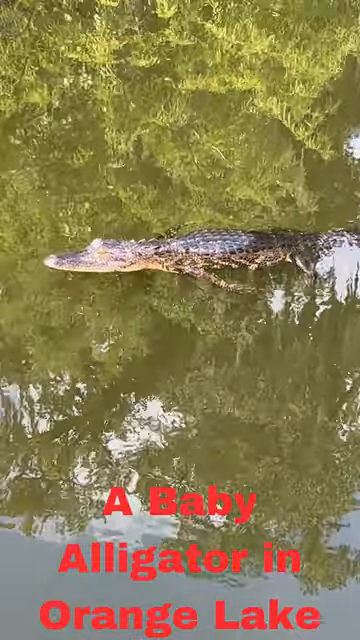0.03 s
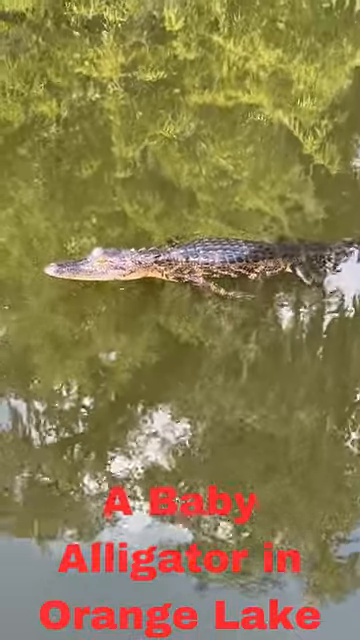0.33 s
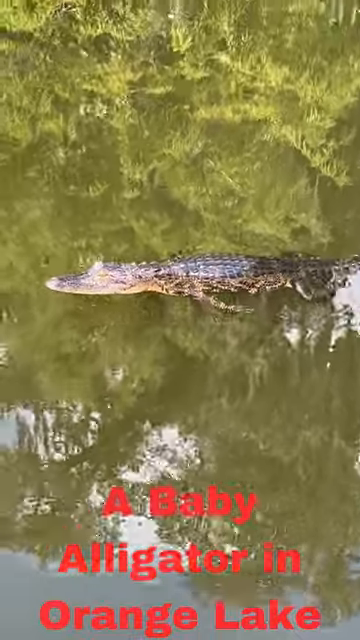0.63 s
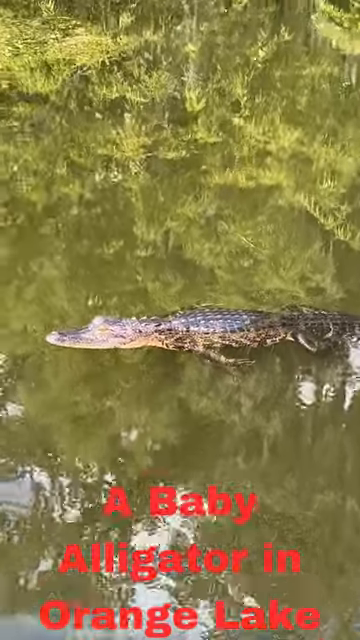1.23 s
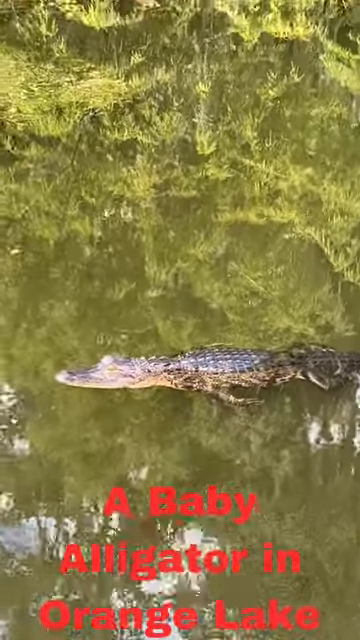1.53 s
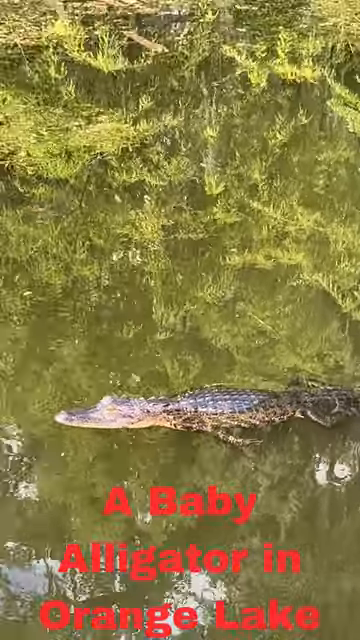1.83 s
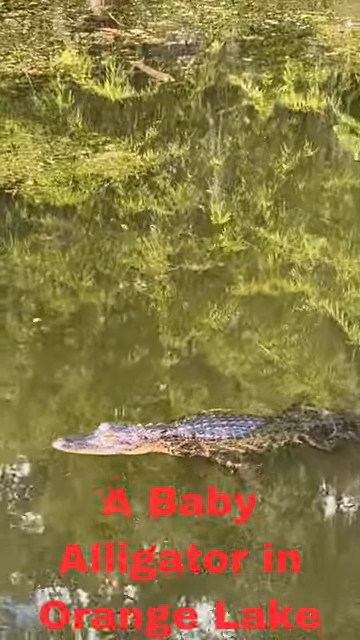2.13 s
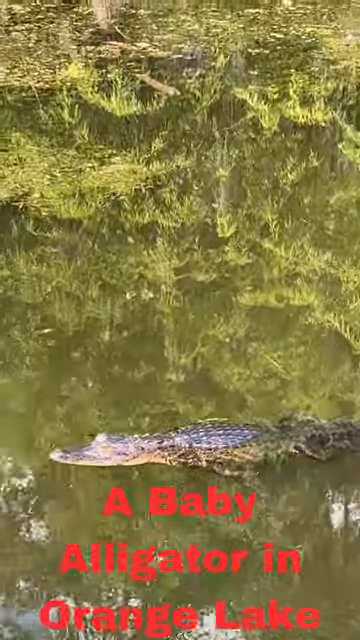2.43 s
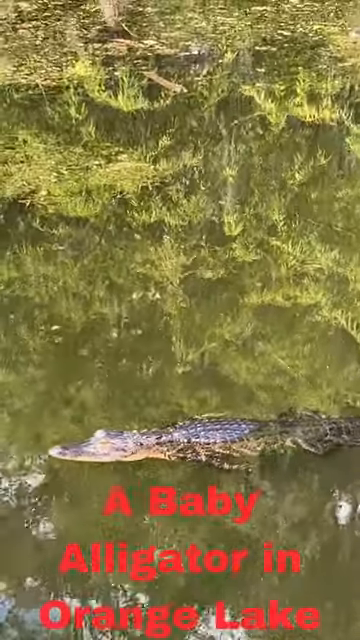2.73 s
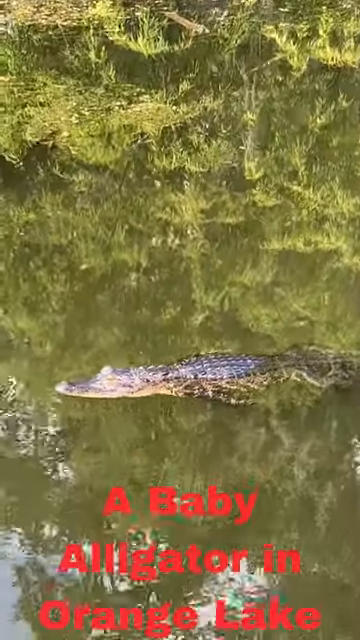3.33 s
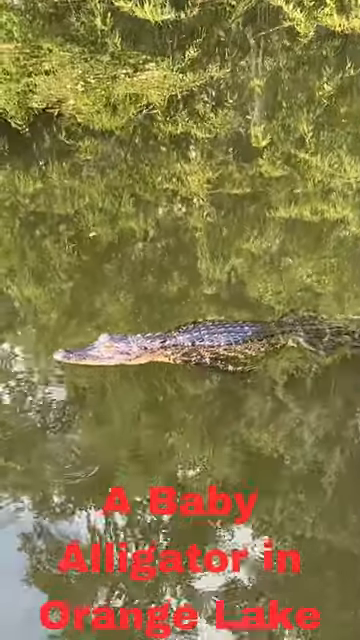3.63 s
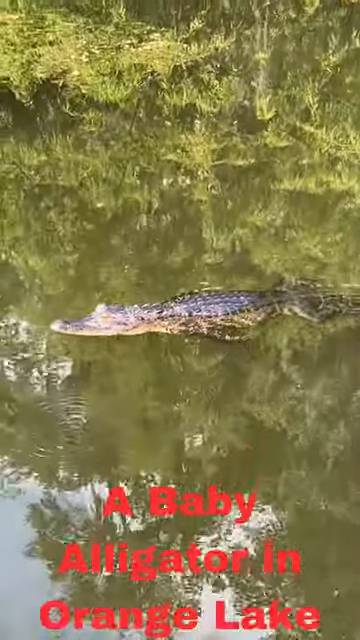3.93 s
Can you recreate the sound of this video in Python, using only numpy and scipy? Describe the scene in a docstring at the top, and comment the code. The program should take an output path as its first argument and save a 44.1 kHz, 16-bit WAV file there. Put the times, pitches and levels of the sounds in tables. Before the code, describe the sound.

High, raspy insect buzzes and ticks come and go beside a quiet swampy lake, with a far motor droning low. Reeds rustle faintly, soft wind puffs brush the microphone, and two thin bird chips follow in the second half.

```python
"""The bank of a swampy lake on a warm day. In the grass ahead, katydids tick and buzz, drawing a toothed
file over a scraper to ring the wing; behind them far insects blur into a hiss. A distant motor drones
across the water in a low rumble. The reeds rustle faintly, a dry stem snaps, soft puffs of wind touch
the microphone, and a small bird chips twice in the second half."""
import sys
import numpy as np
from scipy import signal
from scipy.fft import rfft, irfft
from scipy.io import wavfile

SR = 44100
rng = np.random.default_rng(int(sys.argv[2]) if len(sys.argv) > 2 else 0)


def to_wav(sig):
    """Store sig (one row per channel, or 1-D mono) as 16-bit WAV at the path in sys.argv[1].

    Samples outside -1..1 are clipped; the rate is SR.
    """
    pcm = np.clip(np.atleast_2d(sig), -1, 1) * 32767
    pcm = np.round(pcm).astype(np.int16)
    wavfile.write(sys.argv[1], SR, pcm.T)  # frames by channels


N = 176400
T = np.arange(N) / SR


def undb(db):
    """Decibels to gain."""
    return 10 ** (np.asarray(db) / 20)


def unit(x):
    """Scale to rms 1."""
    return x / np.sqrt(np.mean(x ** 2))


def colour(x, points):
    """Filter by a spectrum of (frequency [Hz], relative level [dB]), keeping the power of white noise."""
    hz, db = np.array(points).T
    f = np.maximum(np.arange(N // 2 + 1) * SR / N, 1)
    gain = unit(undb(np.interp(np.log(f), np.log(hz), db)))
    return irfft(rfft(x) * gain, N)


def noise(points):
    """Coloured noise of rms about 1."""
    return colour(rng.standard_normal(N), points)


def walk(rate):
    """Smooth random wander of rms 1, changing about rate times a second."""
    f = np.arange(N // 2 + 1) * SR / N
    return unit(irfft(rfft(rng.standard_normal(N)) * np.exp(-(f / rate) ** 2) * (f > 0), N))


def bumps(rows):
    """An envelope of bell-shaped swells, one for each (time [s], width [s], level [dB])."""
    return sum(undb(db) * np.exp(-.5 * np.minimum(((T - at) / width) ** 2, 100)) for at, width, db in rows)


def scatter(x, decay_s, wet_db):
    """Add a short diffuse tail from the plants around."""
    tail = rng.standard_normal(N) * np.exp(-T / decay_s)
    return x + undb(wet_db) * signal.fftconvolve(x, tail / np.sqrt(np.sum(tail ** 2)))[:N]


def air():
    """Distant rumble and open air, flickering slightly, wide in the middle range."""
    # what both channels share, and what differs between them (frequency [Hz], relative level [dB])
    mid_colour = [(18, -35), (28, -25), (42, -3.5), (60, 4), (85, 2.5), (135, -0.5), (175, -9), (250, -9.5),
                  (350, -17), (600, -23.5), (950, -25), (1300, -32), (1900, -37), (2600, -35), (4000, -46),
                  (7000, -53.5), (15000, -47.5)]
    side_colour = [(30, -17.5), (100, -10), (200, 11), (450, 13.5), (900, 11), (1300, 2.5), (1800, -4.5),
                   (2600, -58), (4000, -25), (6000, -18), (8000, -8), (15000, -39)]
    # course of the rumble (time [s], level [dB])
    level = [(0, -48.5), (.8, -50), (1.3, -49.5), (1.6, -49), (2.2, -49.5), (2.7, -49.5), (3.4, -49),
             (4, -50)]
    mid = noise(mid_colour) * undb(np.interp(T, *np.array(level).T) + 1.31 * walk(10.4))
    side = noise(side_colour) * undb(-68 + .5 * walk(11))
    return np.array([mid + side, mid - side])


def motor():
    """A far drone and weaker machine tones, wavering on their way over the water."""
    # main note of the motor (time [s], frequency [Hz], level [dB])
    drone = [(0, 70.24, -48), (.8, 71.3, -46), (1.35, 70.9, -46), (1.549, 71.9, -43.5),
             (2.35, 72.12, -44.5), (2.65, 73.66, -43), (3.1, 73.57, -48.5), (4, 73.9, -48.5)]
    # other tones of far machinery (frequency [Hz], level [dB])
    hums = [(57.5, -59), (121.4, -56.5), (143, -66), (199, -69), (232.8, -61.5), (237.8, -64.5),
            (408, -75.5), (425.3, -74), (467.3, -74.5), (554, -80), (815, -83.5), (1440, -89.5),
            (1631, -91), (1680, -87)]
    drift, waver_db = .0019, 2
    at, hz, db = np.array(drone).T
    tone = lambda f: np.sqrt(2) * np.sin(2 * np.pi * (np.cumsum(f) / SR + rng.random()))
    out = tone(np.interp(T, at, hz)) * undb(np.interp(T, at, db))
    for hum_hz, hum_db in hums:
        hum = tone(hum_hz * (1 + drift * walk(3.37)))
        out = out + hum * undb(hum_db) * unit(undb(waver_db * walk(2.4)))
    return out


def insect_chorus():
    """Many far insects blur into a shimmering hiss; lower, thin calls come and go."""
    # spectra of the hiss and of the thin calls (frequency [Hz], relative level [dB])
    hiss_colour = [(4000, -42), (6200, -15.5), (7400, -15), (8500, -9.5), (10000, -7), (11200, 1.5),
                   (12500, 4), (14000, -5.5), (15600, -11.5)]
    call_colour = [(4500, -41), (5850, -6.5), (6150, -4), (6450, -3), (6800, -16), (8500, -56)]
    # rise and fall of the hiss (time [s], level [dB])
    level = [(0, -62), (.3, -62), (.6, -57), (1.3, -55.5), (1.42, -62.5), (1.8, -65.5), (2.1, -63.5),
             (2.6, -59), (3.3, -55.5), (3.5, -60), (3.72, -65), (4, -66)]
    # faint far calls (time [s], width [s], level [dB])
    calls = [(.19, 0.042, -81), (.52, 0.099, -79.5), (1.25, 0.12, -80), (1.58, 0.046, -79),
             (3.761, 0.049, -79.5)]
    hiss = noise(hiss_colour) * undb(np.interp(T, *np.array(level).T) + 1.2 * walk(31))
    return hiss + noise(call_colour) * bumps(calls)


def wing_rasp():
    """File teeth snap past the scraper and ring the katydid's wing."""
    # wing resonance (frequency [Hz], relative level [dB])
    wing = [(4000, -64), (6000, -31), (7500, -21), (9000, -12.5), (10200, -15), (10900, 1), (11700, 2.5),
            (12800, -1.5), (13700, -2.5), (15600, -12)]
    tooth_hz, tooth_share = 2625, .79  # share of the power; the rest is noise
    teeth_passed = np.cumsum(tooth_hz * np.exp(.2 * walk(300))) / SR
    clicks = unit(np.diff(np.floor(teeth_passed), prepend=0))
    return colour(np.sqrt(tooth_share) * clicks + np.sqrt(1 - tooth_share) * rng.standard_normal(N), wing)


def katydids():
    """Two singers in the grass: trains of wing strokes that slow as they end, and single flicks."""
    # single wing flicks (time [s], level [dB])
    ticks = [(.024, -53.5), (0.074, -53), (.123, -52.5), (.391, -54), (.443, -53), (.505, -51), (.561, -53),
             (1.671, -57), (1.725, -55.5), (1.77, -58.5), (1.82, -60), (2.232, -57), (2.301, -61),
             (2.575, -55), (2.643, -54), (2.701, -56), (2.763, -55), (3.921, -52), (3.988, -53)]
    # buzzes (singer, start [s], middle [s], end [s], start level [dB], middle level [dB], end level [dB])
    buzzes = [("quick", 0.17, .45, 1.6, -62, -60, -63), ("slow", .7207, 0.93, 1.4, -63, -53, -62),
              ("slow", 1.335, 1.35, 1.685, -56, -61, -64.5), ("quick", 1.8, 2.96, 3.2, -67.5, -65, -59),
              ("slow", 2.791, 3.2, 3.73, -64, -61, -56)]
    # pace of the wings (singer: stroke rate [Hz])
    stroke_hz = {"quick": 59.3, "slow": 54.0}
    tick_s, stroke_s, jitter_s, attack_s, release_s = .0033, .0032, .0004, .005, .07
    out = wing_rasp() * bumps((at, tick_s, db) for at, db in ticks)
    for singer, start, middle, end, *levels_db in buzzes:
        rate = stroke_hz[singer]
        lag = .8 * np.exp(np.minimum(T - end, 0) / .035)  # the slowing wings fall 0.8 stroke behind
        strokes = (T - start + jitter_s * walk(20)) * rate - lag
        from_peak_s = (strokes % 1 - .5) / rate
        pulses = unit(np.exp(-.5 * (from_peak_s / stroke_s) ** 2) * undb(1.5 * walk(35)))
        gate = np.clip(np.minimum((T - start) / attack_s, (end - T) / release_s), 0, 1)
        out = out + wing_rasp() * pulses * gate * undb(np.interp(T, [start, middle, end], levels_db))
    return scatter(out, decay_s=.02, wet_db=-9)


def reeds():
    """Dry stems brush and tap in brief grainy bursts."""
    # faint rustles (time [s], decay [s], level [dB])
    rustles = [(.13, 0.038, -61.5), (1.317, 0.036, -70), (1.437, 0.011, -69), (1.672, 0.013, -71),
               (1.71, 0.0093, -64), (1.805, .02, -70), (2.329, 0.0097, -67), (3.793, 0.021, -61)]
    # their spectrum (frequency [Hz], relative level [dB])
    spectrum = [(300, -35), (1200, 26), (2300, 24.5), (4500, 14), (8000, 17), (15000, -36)]
    attack_s = .004
    envelope = sum(undb(db) * np.clip((T - at) / attack_s, 0, 1) * np.exp(-np.abs(T - at) / decay_s)
                   for at, decay_s, db in rustles)
    grains = unit(rng.standard_normal(N) * undb(3.7 * walk(310)))
    return envelope * colour(grains, spectrum)


def far_swells():
    """The distant noise swells softly in the middle range, diffuse across both channels."""
    # swells (time [s], width [s], level [dB])
    swells = [(.17, 0.057, -70), (1.32, 0.043, -69), (1.56, 0.045, -69), (1.92, 0.16, -69),
              (2.5, .16, -69.5), (2.95, 0.19, -72.5), (3.87, .06, -67)]
    # their spectrum (frequency [Hz], relative level [dB])
    spectrum = [(300, -13), (520, -6), (700, -5), (900, 9), (1250, -10), (1700, -20), (2400, -52)]
    return np.array([noise(spectrum), noise(spectrum)]) * bumps(swells)


def wind_puffs():
    """Light wind buffets the microphone in the deep bass."""
    # soft puffs (time [s], width [s], level [dB])
    puffs = [(0.686, 0.06, -52), (1.701, 0.066, -52), (2.63, 0.044, -48), (3.35, 0.042, -49)]
    return noise([(15, -43), (30, 14), (50, 21), (110, -29), (500, -62)]) * bumps(puffs)


def stem_snap():
    """A dry stem snaps with a small bright click."""
    # the snap (time [s], level [dB])
    snaps = [(1.321, -51)]
    decay_s = .0025
    envelope = sum(undb(db) * (T > at) * np.exp(-np.abs(T - at) / decay_s) for at, db in snaps)
    return envelope * noise([(1000, -26), (4000, -15), (7000, -2), (13000, 0), (15500, -5)])


def bird():
    """A small bird's thin warbling glides, with a weak octave and a short echo."""
    # three glides, the last two joined in one chip; each of (time [s], frequency [Hz], level [dB])
    glides = [
        [(2.532, 6600, -78), (2.54, 7200, -64), (2.548, 7400, -69), (2.553, 7550, -86)],
        [(3.841, 6700, -71), (3.848, 6250, -66), (3.862, 6500, -72), (3.872, 6400, -65), (3.883, 5750, -61),
         (3.891, 5336, -70), (3.898, 4520, -64), (3.904, 3780, -77), (3.909, 3380, -67), (3.915, 3250, -73)],
        [(3.92, 10000, -73), (3.925, 8600, -67), (3.93, 8450, -77)],
    ]
    warble, flutter_hz, octave_db = .045, 450, -5
    out = 0
    for glide in glides:
        at, hz, db = np.array(glide).T
        pitch = np.interp(T, at, hz) * (1 + warble * walk(flutter_hz))
        phase = 2 * np.pi * np.cumsum(pitch) / SR
        voice = np.sin(phase) + undb(octave_db) * np.sin(2 * phase)
        gate = (T > at[0]) * (T < at[-1])
        out = out + voice * undb(np.interp(T, at, db) + 2.3 * walk(110)) * gate
    return scatter(out, decay_s=.025, wet_db=-8)


def scene():
    """From the bank in stereo: insects ahead with a little spread, the distant air wide around them."""
    insects = katydids() + insect_chorus()
    spread = undb(-21) * (scatter(insects, decay_s=.0035, wet_db=0) - insects)
    background = air() + wind_puffs() + far_swells() + motor()
    return background + reeds() + stem_snap() + bird() + insects + np.array([spread, -spread])


def record(dry):
    """The microphone has a narrow dip in the treble; the top is cut steeply."""
    notch_hz, top_hz = 5030, 15650
    dipped = signal.lfilter(*signal.iirnotch(notch_hz, Q=12, fs=SR), dry)
    return signal.sosfilt(signal.ellip(10, .2, 80, top_hz, fs=SR, output="sos"), dipped)


dry = scene()
out = record(dry)
to_wav(out)
```